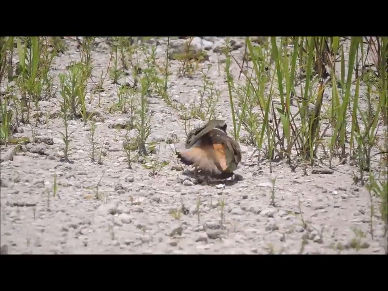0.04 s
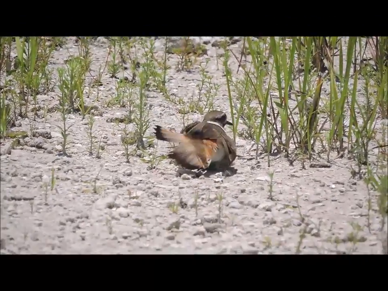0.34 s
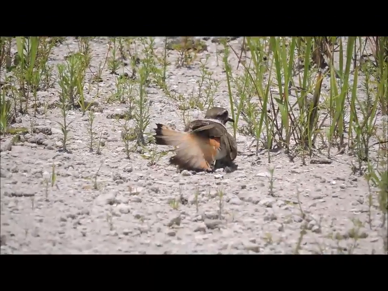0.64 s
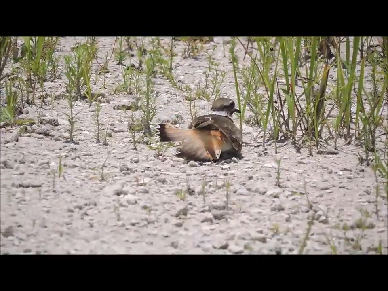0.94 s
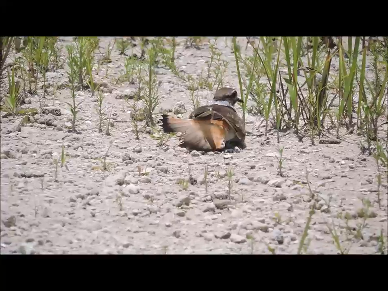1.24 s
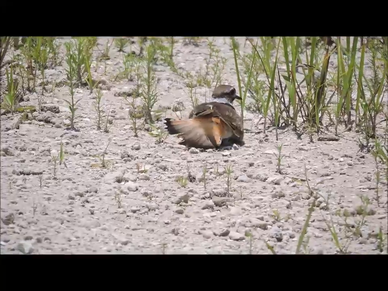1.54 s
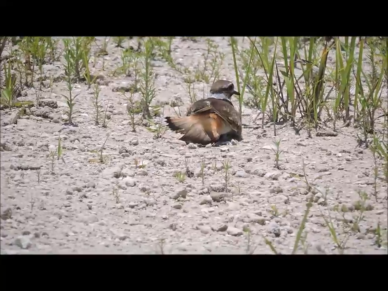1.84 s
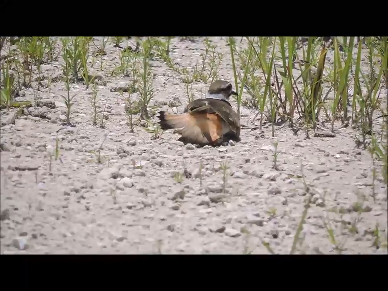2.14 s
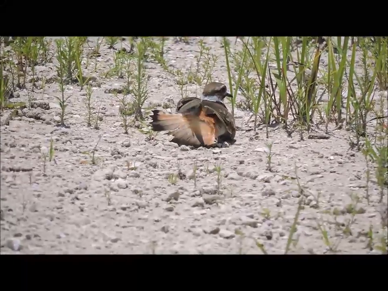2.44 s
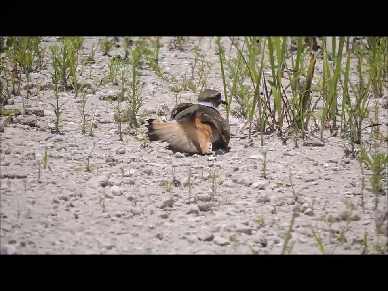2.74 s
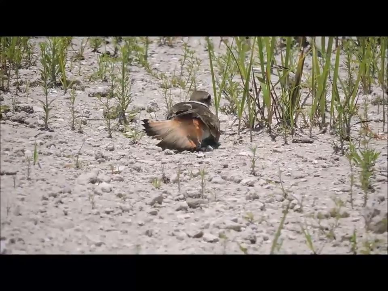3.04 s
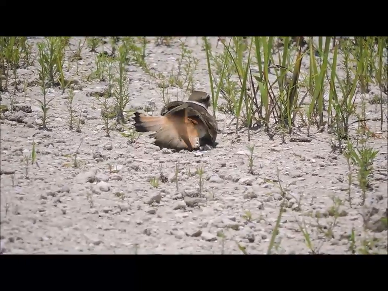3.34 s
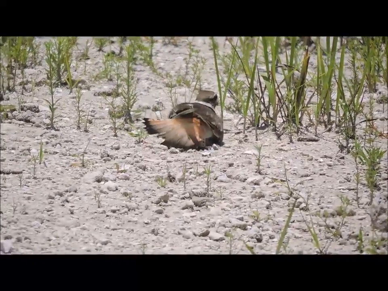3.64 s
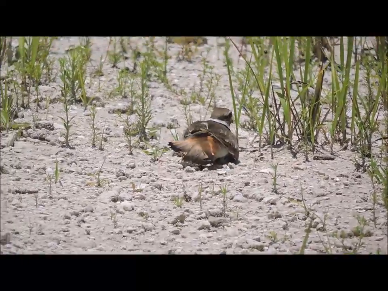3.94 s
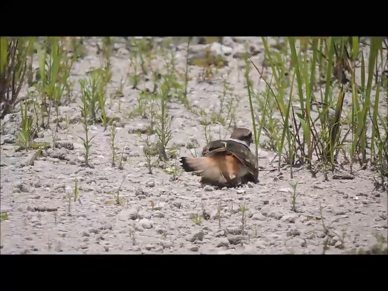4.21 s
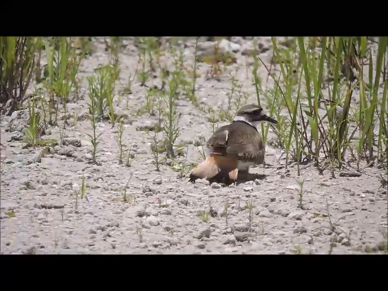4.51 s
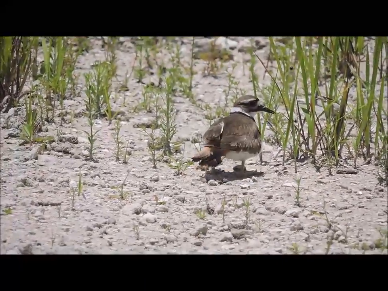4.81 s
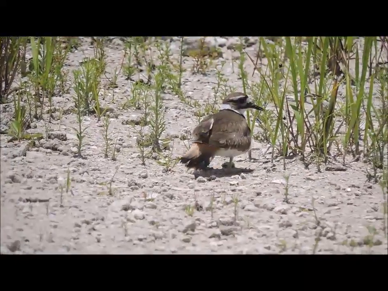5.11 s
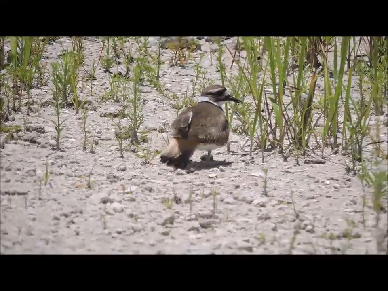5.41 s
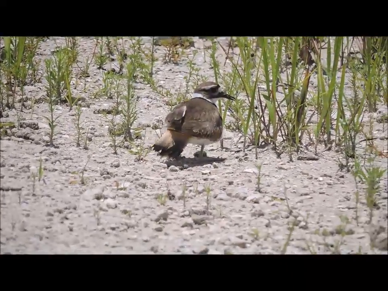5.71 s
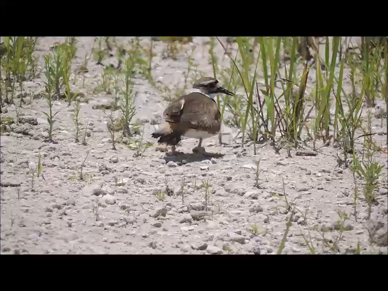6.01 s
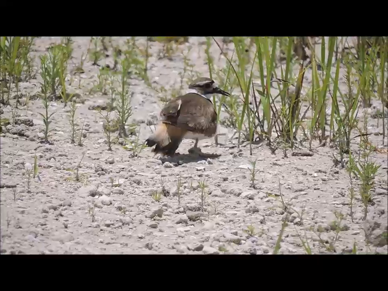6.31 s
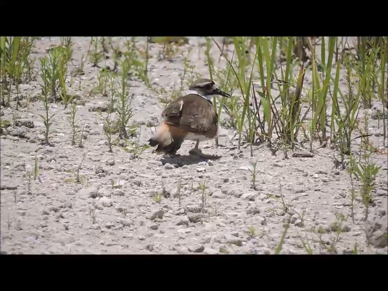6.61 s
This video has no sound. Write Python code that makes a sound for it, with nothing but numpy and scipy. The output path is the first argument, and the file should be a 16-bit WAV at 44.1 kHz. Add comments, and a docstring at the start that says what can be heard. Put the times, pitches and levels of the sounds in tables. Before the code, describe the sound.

A faint, far-off bird trill under low wind rumble that builds into uneven buffeting on the microphone.

```python
"""Open ground in the wind, heard through the two ports of a camera microphone.
A soft outdoor wash and the hiss of the capsules lie under a far bird, trilling low notes among quick
rising ones. Right at the microphone each port has its own turbulence, brighter as the flow quickens.
The left port is sheltered; the right faces the wind, takes the puffs and is thumped by single eddies."""
import sys
import numpy as np
from scipy import signal
from scipy.fft import rfft, irfft, next_fast_len
from scipy.io import wavfile
from scipy.ndimage import uniform_filter1d

SR = 44100
rng = np.random.default_rng(int(sys.argv[2]) if len(sys.argv) > 2 else 0)


def to_wav(sig):
    """Store sig (one row per channel, or 1-D mono) as 16-bit WAV at the path in sys.argv[1].

    Samples outside -1..1 are clipped; the rate is SR.
    """
    pcm = np.clip(np.atleast_2d(sig), -1, 1) * 32767
    pcm = np.round(pcm).astype(np.int16)
    wavfile.write(sys.argv[1], SR, pcm.T)  # frames by channels


N = 293706


def undb(db):
    """Decibels to gain."""
    return 10 ** (np.asarray(db) / 20)


def curve(rows):
    """Rows of (seconds, value) joined by straight lines."""
    return np.interp(np.arange(N) / SR, *np.transpose(rows))


def at_pitch(rows, hz):
    """Read rows of (Hz, dB) on a log-frequency axis."""
    row_hz, db = np.transpose(rows)
    return np.interp(np.log(np.maximum(hz, 1)), np.log(row_hz), db)


def noise(gain_at):
    """Noise of rms 1 whose spectrum follows a function of frequency."""
    size = next_fast_len(N, True)
    hz = np.arange(size // 2 + 1) * SR / size
    shaped = irfft(rfft(rng.standard_normal(size)) * gain_at(hz), size)[:N]
    return shaped / np.sqrt(np.mean(shaped ** 2))


def band(hz):
    """Half an octave of noise around hz."""
    return noise(lambda f: np.cos(np.pi / 2 * np.clip(2 * np.log2((f + 1) / hz), -1, 1)))


def wander(rate):
    """A smooth random curve of rms 1 that changes about rate times a second."""
    return noise(lambda f: np.exp(-(f / rate) ** 2))


def running_rms(x, seconds):
    """The local strength of a signal, averaged twice over the given time."""
    size = int(seconds * SR)
    return np.sqrt(uniform_filter1d(uniform_filter1d(x ** 2, size), size) + 1e-12)


# The microphone's own noise floor. Each row: frequency in Hz, relative spectral density in dB.
HISS_SPECTRUM = [(1000, 4.5), (3000, 0), (5500, 0.3), (8000, -3.5), (11000, -5), (16000, -3)]


def capsule_hiss(left_db=-67, right_db=-70):
    """Each capsule hisses steadily on its own."""
    return np.array([undb(db) * noise(lambda f: undb(at_pitch(HISS_SPECTRUM, f)))
                     for db in (left_db, right_db)])


# The open land, far off. Each row: frequency in Hz, relative spectral density in dB.
WASH_SPECTRUM = [(60, 5), (150, -1), (300, -1.5), (480, -6.5), (680, -5), (850, -7), (1350, -13.5),
                 (2000, -18.5), (2700, -22), (3700, -29), (5500, -33.5), (8000, -38.5), (12000, -42)]
# Its drift at the microphone. Each row: time in seconds, level in dB, tilt about 500 Hz in dB per octave.
WASH_DRIFT = [(0, -48.5, -1.24), (.8, -48.5, -0.7), (1.3, -48.5, -1), (1.5, -51.5, -.1),
              (2.6, -49.5, -0.56), (3.95, -50.5, 0.14), (4.25, -52, -1), (4.85, -52, 0.25), (5.55, -51, 0),
              (6.2, -54, -0.5), (6.66, -51.5, 0.1)]
# Its width across the two ports. Each row: frequency in Hz, side minus mid in dB.
WASH_WIDTH = [(100, -17.5), (400, -12), (800, -7), (1400, -4), (2500, 0.5), (4500, 1)]


def far_wash():
    """Distant air and vegetation: alike at both ports in the bass, unrelated in the treble."""
    level_db, tilt_db = (curve(np.array(WASH_DRIFT)[:, [0, k]]) for k in (1, 2))
    centres_hz = 60 * 2 ** (np.arange(16) / 2)
    weights = np.sqrt(centres_hz) * undb(at_pitch(WASH_SPECTRUM, centres_hz))
    out = 0
    for hz, weight in zip(centres_hz, weights / np.linalg.norm(weights)):
        mid = band(hz)
        side = band(hz) * undb(at_pitch(WASH_WIDTH, hz))
        db = level_db + tilt_db * np.log2(hz / 500)
        out = out + weight * undb(db) * np.array([mid + side, mid - side])
    return out


# One bird, far from the microphone, in bouts. Each row: start and end in seconds, first period in
# seconds, pitch factor, base level of the low note in dB, base level of the rising notes in dB.
TRILL_BOUTS = [(-.075, 1.155, .166, 1.01, -68, -66.5), (1.844, 3.4, .160, 1.005, -57, -64)]
# One period of its trill, low note first. Each row: start as a share of the period, typical length in
# seconds, start and end pitch in Hz before the pitch factor, level offset in dB.
TRILL_MOTIF = [(0, .06, 2270, 2380, -3), (.03, .042, 2530, 2700, -2), (.55, 0.041, 2510, 2730, -.5)]


def trill_notes(slowing_s=0.0052, edge_db=-2.5, swell_db=3):
    """The motif repeats, slowing; a bout grows, softer at its ends, and no two notes are quite alike."""
    for start, end, period, pitch, low_db, rising_db in TRILL_BOUTS:
        period_start, voices_db = start, (low_db, rising_db, rising_db)
        while period_start < end:
            from_middle = (period_start - start) / (end - start) - 0.5
            arch_db = edge_db * (2 * from_middle) ** 2 + swell_db * from_middle
            for (share, length, start_hz, end_hz, db), voice_db in zip(TRILL_MOTIF, voices_db):
                sharper, louder, longer = rng.standard_normal(3)
                onset = period_start + share * period
                tuning = pitch * (1 + 0.01 * sharper)
                note_db = voice_db + arch_db + db + 2 * louder
                if onset > 0:
                    yield onset, length * np.exp(0.2 * longer), start_hz * tuning, end_hz * tuning, note_db
            period_start += period
            period += slowing_s


def distant_bird(trim_db=-2.2, scatter_db=-3, scatter_s=0.1, waver=0.0092):
    """Near-pure notes that bend upwards; ground and reeds scatter a short tail to each port."""
    song, wobble = np.zeros(N), 1 + waver * wander(60)
    t = np.arange(SR // 2) / SR
    tails = rng.standard_normal((2, len(t))) * np.exp(-t / scatter_s)
    tails /= np.linalg.norm(tails, axis=1, keepdims=True)
    for onset, length, start_hz, end_hz, db in trill_notes():
        progress = np.linspace(0, 1, int(length * SR))
        span = slice(int(onset * SR), int(onset * SR) + len(progress))
        hz = (start_hz + (end_hz - start_hz) * progress ** 1.4) * wobble[span]
        envelope = np.sqrt(4 * progress * (1 - progress))
        tone = np.sqrt(2) * np.sin(2 * np.pi * np.cumsum(hz) / SR)
        song[span] += undb(db + trim_db) * envelope * tone
    return song + undb(scatter_db) * signal.fftconvolve(song[None], tails, axes=1)[:, :N]


def small_eddies(flow_db, per_second=22, shedding_db=-26):
    """A fresh flow sheds lesser eddies at random, their peaks close to its own level."""
    times = np.cumsum(rng.exponential(size=200)) / per_second
    chance = rng.standard_normal((len(times), 2))
    local_db = np.interp(times, np.arange(N) / SR, flow_db)
    return [(time, db + 1 + 1.5 * stronger, 0.98 * np.exp(0.1 * wider))
            for time, db, (stronger, wider) in zip(times, local_db, chance)
            if db > shedding_db and time < N / SR]


# Strong eddies, right on the exposed port. Each row: time in seconds, peak in dB, half width in ms.
STRONG_EDDIES = [(1.405, -8.5, 1), (1.489, -11, 2.9), (1.901, -15.5, 0.66), (2.762, -10, 1.16),
                 (3.155, -2.5, 1.17), (3.283, -12, 0.96), (3.397, -15.5, 0.71), (3.444, -13, 0.97),
                 (3.69, -7, 2.74), (3.827, -16.5, 0.73), (3.868, -14.5, 0.64), (3.890, -5.5, 0.97),
                 (3.974, -18.5, .55), (3.994, -7.5, 0.84), (4.006, -12, 0.84), (4.14, -15, 0.72),
                 (4.828, -8, 1.3), (4.863, -10, 1.8), (4.958, -8, 0.52), (5.113, -13, 1.13),
                 (5.335, -11, 0.87), (5.403, -12, 1.25), (5.437, -12, 1), (5.472, -4, 0.77), (5.478, -9, 1),
                 (5.745, -11.5, 0.5), (5.761, -6.5, 0.53), (5.828, -8.5, 0.91), (5.879, -4.5, 0.91),
                 (6.066, -10.5, 0.79), (6.088, -17.5, 0.61), (6.137, -10, .75), (6.35, -15.5, 0.75),
                 (6.51, -13, 0.75), (6.591, -18, 0.69)]


def eddy_thumps(flow_db, port_hz=115, port_q=0.87, skirt=1.6):
    """A vortex core sucks briefly at the port; the bass roll-off makes the dip a thump with a rebound."""
    out, t = np.zeros(N), np.arange(-SR // 25, SR // 25) / SR
    omega = 2 * np.pi * port_hz
    roll_off = signal.bilinear([1, 0, 0], [1, omega / port_q, omega ** 2], SR)
    for time, peak_db, half_ms in STRONG_EDDIES + small_eddies(flow_db):
        across = t / (half_ms / 1000)
        # skirt sets how fast the suction dies away from the core
        pressure_dip = -np.hanning(len(t)) / (1 + across ** 2 / skirt) ** skirt
        thump = signal.lfilter(*roll_off, pressure_dip)
        thump *= undb(peak_db) / np.abs(thump).max()
        start = int((time + t[0]) * SR)
        out[start:start + len(t)] += thump[:N - start]
    return out


# The rumble of a fresh gust at a port. Each row: frequency in Hz, relative spectral density in dB.
GUST_SPECTRUM = [(12, -19), (25, -7.5), (45, 0.1), (70, 2.5), (110, 0.5), (170, -2.5), (250, -9.5),
                 (350, -19), (500, -30), (750, -42.5), (1200, -59), (2500, -65.5)]


def turbulence(flow_db, brighten, flutter_db, pitch_factor, fresh_gust_db=-20):
    """Half-octave bands of eddies: quicker flow moves the spectrum up, and small eddies come in bursts."""
    stretch = pitch_factor * undb(brighten * (flow_db - fresh_gust_db))
    bursts, rumble = wander(50), 0
    for hz in 16 * 2 ** (np.arange(15) / 2):
        burst_db = flutter_db * min(hz / 300, 1) * bursts
        band_db = at_pitch(GUST_SPECTRUM, hz / stretch) + burst_db
        rumble = rumble + band(hz) * np.sqrt(hz) * undb(band_db)
    # the flow sets the overall strength, the eddies only share it out
    return rumble / running_rms(rumble, seconds=0.11) * undb(flow_db)


# The breeze on the lee side of the microphone. Each row: time in seconds, base level in dB.
LEFT_BREEZE = [(0, -51), (1.35, -44.5), (1.46, -36.5), (1.55, -45), (1.67, -35.5), (2.42, -38), (2.64, -28),
               (2.95, -35), (3.3, -30.5), (4.0, -37), (4.35, -30.5), (4.95, -33), (5.25, -39.5), (5.7, -42),
               (6.02, -25.5), (6.2, -42.5), (6.45, -43), (6.66, -25.5)]


def sheltered_port(surge_db=3.5, trim_db=0.9):
    """An unsteady flow surges and flutters over the left port."""
    flow_db = curve(LEFT_BREEZE) + surge_db * wander(18)
    return undb(trim_db) * turbulence(flow_db, brighten=0.22, flutter_db=8.5, pitch_factor=1.05)


# The breeze on the windward side of the microphone. Each row: time in seconds, base level in dB.
RIGHT_BREEZE = [(0, -49.5), (1.3, -43.5), (1.6, -40), (1.86, -34.5), (2.0, -30), (2.7, -28.5),
                (3.03, -30.5), (3.7, -25), (4.25, -30.5), (4.75, -28), (5.05, -26.5), (5.55, -34),
                (5.72, -32.5), (6.66, -23)]
# Puffs straight into that port. Each row: start and hold in seconds, level in dB, shift of the
# spectrum in octaves.
PUFFS = [(1.377, 0.032, -14, -0.41), (1.479, 0.013, -23, -0.047), (1.73, 0.054, -22.5, 0.09),
         (2.165, 0.034, -22.5, 0.082), (2.66, 0.08, -26, 0), (3.133, 0.25, -24, 0.15),
         (3.478, .13, -23, -.1), (3.825, 0.098, -18.5, -0.18), (3.956, 0.095, -20.5, 0.15),
         (4.085, 0.048, -18.5, -0.12), (4.22, 0.026, -24, 0.2), (4.364, .025, -24.5, -0.34),
         (4.453, .21, -23.5, -0.039), (4.818, 0.049, -22, 0.028), (4.959, 0.019, -20, 0.055),
         (5.213, 0.032, -20, 0), (5.325, 0.031, -19.5, 0.019), (5.434, 0.054, -21.5, 0.013),
         (5.75, 0.013, -16.5, -0.081), (5.818, 0.33, -18.5, 0.21), (6.249, 0.15, -22, 0.034),
         (6.488, 0.2, -19.5, 0.072)]


def exposed_port(attack_s=0.016, release_s=0.02, surge_db=0.37):
    """Breeze, puffs and eddies buffet the right port; a puff swells quickly, holds and falls away."""
    t = np.arange(N) / SR
    energy, weighted_octaves = undb(curve(RIGHT_BREEZE)) ** 2, 0
    for start, hold, db, octaves in PUFFS:
        falloff = np.maximum(start - t, 0) / attack_s + np.maximum(t - start - hold, 0) / release_s
        puff_energy = (undb(db) * np.exp(-np.minimum(falloff, 20))) ** 2
        energy += puff_energy
        weighted_octaves += puff_energy * octaves
    flow_db = 10 * np.log10(energy) + surge_db * wander(18)
    pitch_factor = 2 ** (weighted_octaves / energy)
    rumble = turbulence(flow_db, brighten=0.15, flutter_db=5, pitch_factor=pitch_factor)
    return rumble + eddy_thumps(flow_db)


def scene():
    """Wind close on the two ports, over the far wash, the hiss and the bird."""
    wind = np.array([sheltered_port(), exposed_port()])
    return wind + far_wash() + capsule_hiss() + distant_bird()


def record(dry, fade_s=0.007, top_hz=15750):
    """The sound starts and stops softly over a few milliseconds, and the camera cuts the top steeply."""
    fade = signal.windows.tukey(N, 2 * fade_s * SR / N)
    low_pass = signal.ellip(12, 0.1, 90, top_hz, fs=SR, output="sos")
    return signal.sosfilt(low_pass, dry * fade)


dry = scene()
out = record(dry)
to_wav(out)
```